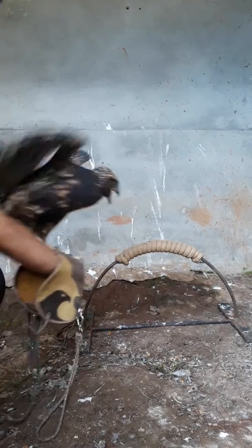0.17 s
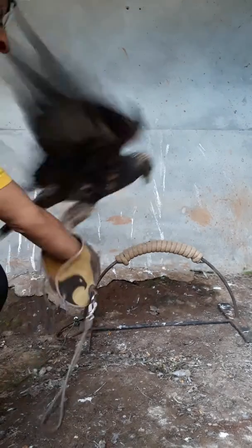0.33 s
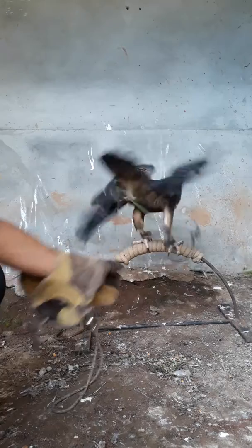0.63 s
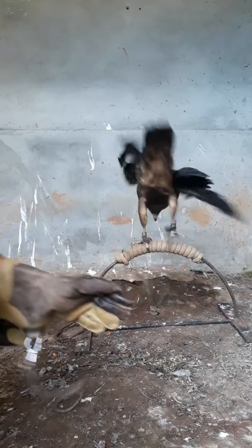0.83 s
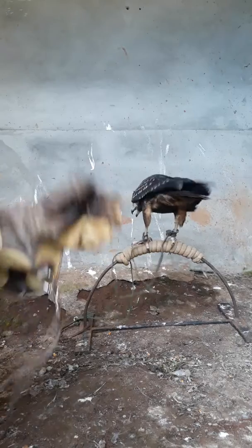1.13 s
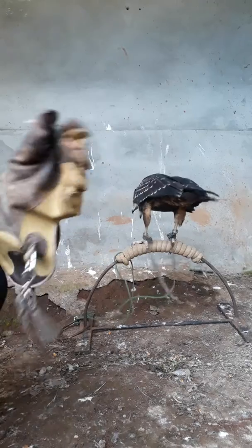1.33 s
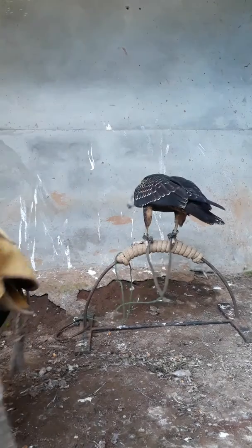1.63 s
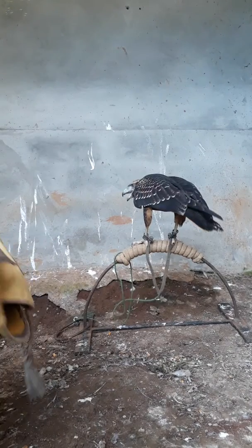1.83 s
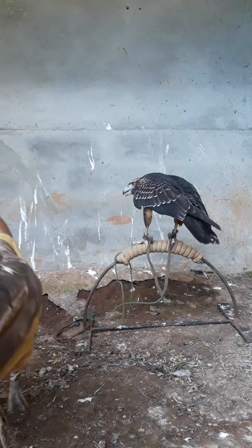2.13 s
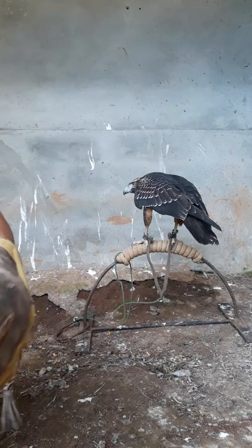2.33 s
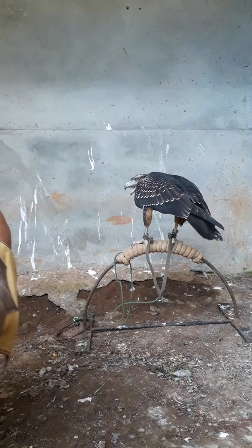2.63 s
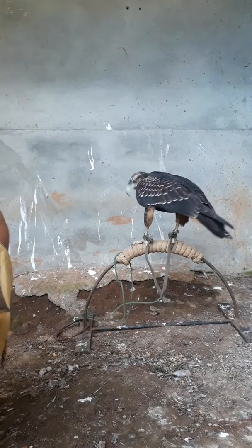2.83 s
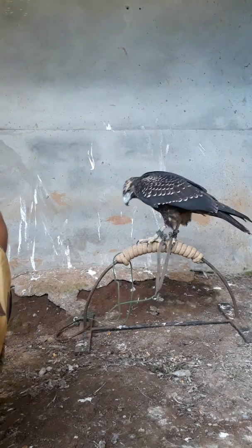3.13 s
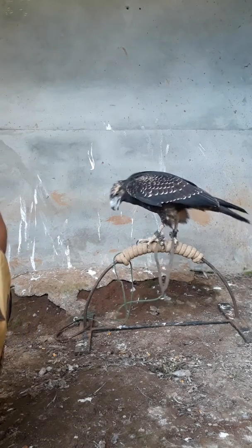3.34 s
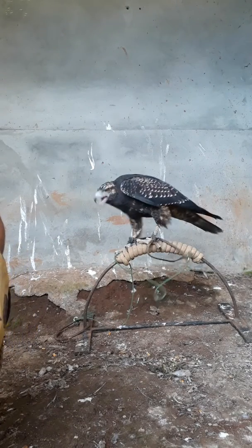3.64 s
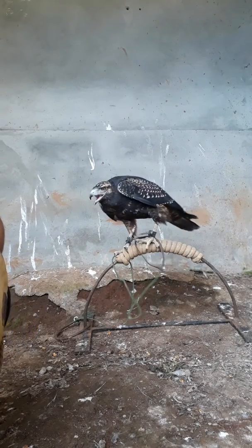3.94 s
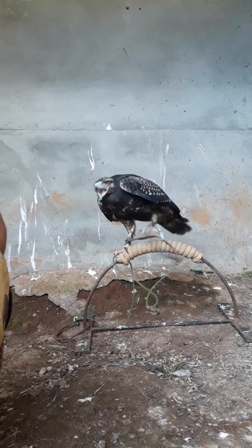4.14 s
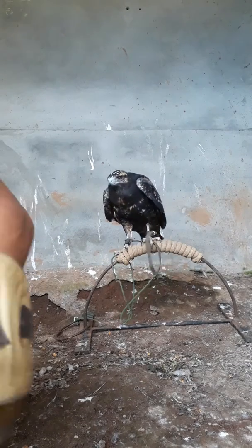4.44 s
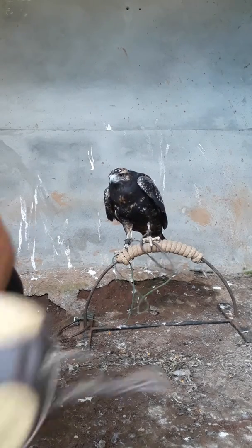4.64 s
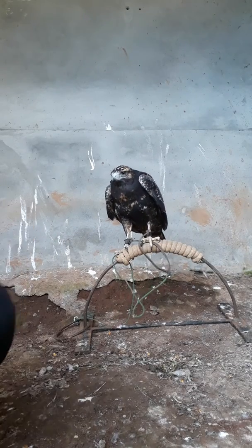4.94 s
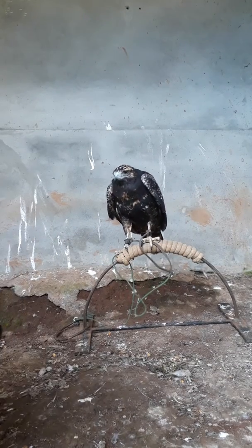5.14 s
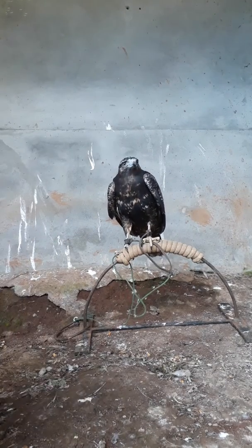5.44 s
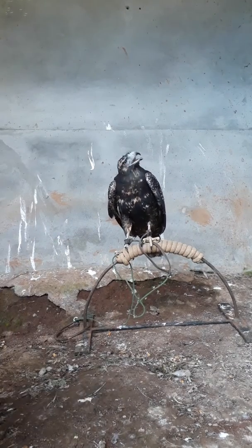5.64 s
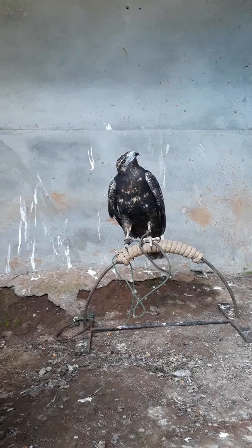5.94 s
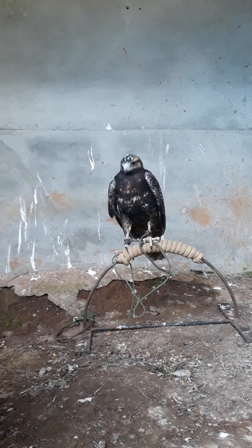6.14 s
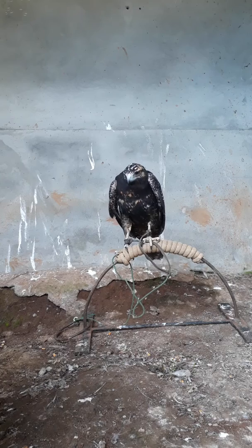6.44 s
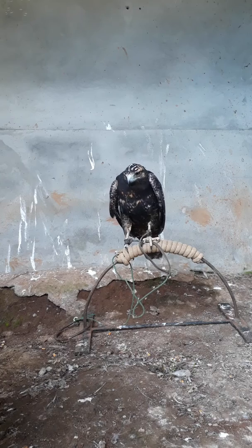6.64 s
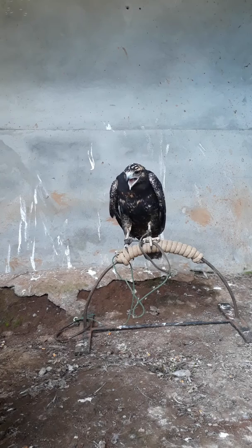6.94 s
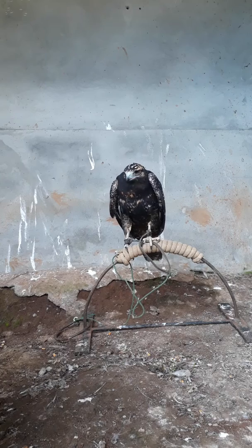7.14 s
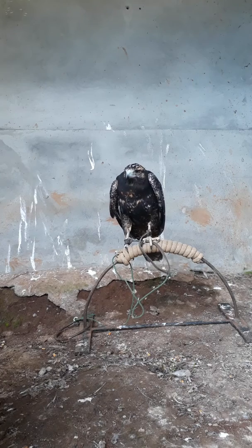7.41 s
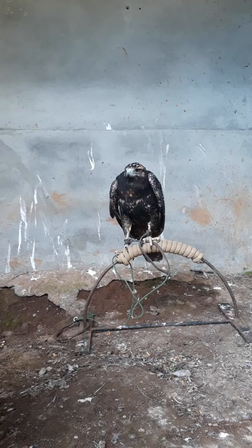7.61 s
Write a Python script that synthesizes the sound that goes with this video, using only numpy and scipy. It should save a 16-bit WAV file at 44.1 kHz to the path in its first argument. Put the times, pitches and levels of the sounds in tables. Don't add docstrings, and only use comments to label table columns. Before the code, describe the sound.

A young bird of prey begs loudly in a bare concrete pen. Seven calls come quickly, each a breathy high whistle that plunges into a short hoarse cry, often followed by a rising squeak. Feathers rustle and a steel swivel ticks. After the seventh call come knocks and scrapes, then two more spaced cries. Hard walls ring; distant traffic hums. Close, thin phone microphone.

```python
import sys
import numpy as np
from scipy import signal
from scipy.fft import rfft, irfft
from scipy.io import wavfile
from scipy.ndimage import uniform_filter1d, map_coordinates

SR = 44100
rng = np.random.default_rng(int(sys.argv[2]) if len(sys.argv) > 2 else 0)


def gain_from_db(level_db):
    decades = np.asarray(level_db, float) / 20
    return 10 ** decades


def transcribe(u):
    v = np.clip(np.atleast_2d(u).T, -1, 1)
    q = np.round(v * 32767).astype(np.int16)
    wavfile.write(sys.argv[1], SR, q)


N = 342657
TIME = np.arange(N) / SR
STEPS = np.linspace(0, 1, 17)

# start t/s, length t/s, pitch f/Hz, fundamental level/dB, entry above the pitch [share]
CRIES = [(0.217, 0.12779, 1789, -24, 0.13), (0.727, 0.087247, 1770, -20.5, 0.092),
         (1.329, 0.12099, 1945, -21, -0.043), (2.03, 0.14383, 1947, -20.5, -.045),
         (2.818, 0.1226, 1895, -22, -0.066), (3.609, 0.11407, 1863, -27, 0.05),
         (4.232, .142, 1829, -25, 0.056), (5.712, 0.09767, 1659, -18.5, 0.067),
         (7.002, 0.15479, 1928, -23, -0.015)]


def unit(x):
    return x / np.sqrt(np.mean(x ** 2) + 1e-20)


def along(points, hz):
    f, v = np.transpose(points)
    return np.interp(np.log(hz + 1), np.log(f + 1), v)


def over_time(points):
    return np.interp(TIME, *np.transpose(points))


def coloured(x, points):
    return irfft(rfft(x) * gain_from_db(along(points, np.fft.rfftfreq(N, 1 / SR))), N)


def wobble(rate):
    return map_coordinates(rng.standard_normal(int(N * rate / SR) + 4), [TIME * rate])


def noise(spectrum, patchy_db=0):
    z = signal.stft(rng.standard_normal(N), SR, nperseg=512)[2]
    field = uniform_filter1d(rng.standard_normal(z.shape), size=9, axis=0)
    field = uniform_filter1d(field, size=8, axis=1)
    white = signal.istft(z * gain_from_db(patchy_db * unit(field)), SR, nperseg=512)[1][:N]
    return unit(coloured(white, spectrum))


def played(rows, fade=0.0062):
    s, *cols = np.transpose(rows)
    span = slice(round(s[0] * SR), round(s[-1] * SR))
    t = TIME[span]
    gate = np.clip(np.minimum(t - s[0], s[-1] - t) / fade, 0, 1)
    return span, gate, [np.interp(t, s, c) for c in cols]


def burst(start, length, crest, fade_db, *levels_db):
    away = np.where(STEPS < crest, 1 - STEPS / crest, (STEPS - crest) / (1 - crest))
    return np.transpose([start + length * STEPS] + [db + fade_db * away ** 1.3 for db in levels_db])


def narrow(rows, hz, width):
    out = np.zeros(N)
    span, gate, (db,) = played(rows)
    band = [(hz * (1 - 3 * width), -36), (hz * (1 - width), 0),
            (hz * (1 + width), 0), (hz * (1 + 3 * width), -36)]
    out[span] = gate * gain_from_db(db) * noise(band)[span]
    return out


def whistle():
    # f/Hz, level/dB per Hz
    breath = [(1800, -53.5), (2900, -18), (3800, 1), (5500, 4.5), (7000, 2.5), (9300, -8), (10500, -8.5),
              (15500, -21)]
    out = np.zeros(N)
    hiss = unit(noise(breath, patchy_db=2.5) * gain_from_db(2.5 * wobble(220)))
    flutter, smear = wobble(300), wobble(900)
    stray, patches_db = .014 * wobble(70), 3.3 * wobble(110)
    drift = .016 * wobble(22)
    for rows, (octave_db, third_db, rough, veil_db, fuzz) in squeaks() + held_whistles() + strands():
        span, gate, (hz, tone_db, breath_db) = played(rows, fade=.011)
        swell_db = tone_db - tone_db[0]
        weak = np.clip(1 - swell_db / 16, .06, 1)
        shake = fuzz * weak * smear[::-1][span] + rough * (.013 * flutter[span] + stray[span])
        turn = 2 * np.pi * np.cumsum(hz * (1 + drift[span] + shake)) / SR
        veiled_db = octave_db + np.interp(2 * hz, (8800, 10000), [0, veil_db])
        tone = np.sin(turn) + gain_from_db(veiled_db) * np.sin(2 * turn)
        tone = tone + gain_from_db(third_db - .8 * swell_db) * np.sin(3 * turn)
        tone = (1 + .5 * rough * smear[span]) * tone
        tone = gain_from_db(tone_db - 1.5 + rough * patches_db[span]) * tone
        out[span] += gate * (tone + gain_from_db(breath_db) * hiss[span])
    return out + voice_breaks()


def held_whistles():
    holds = [
        (.055, 4200, 5325, -35.5, -36),
        (.56, 4030, 5354, -32.5, -39),
        (1.205, 6556, 5500, -34, -40),
        (1.873, 6900, 5831, -43.5, -39.5),
        (2.695, 6220, 5500, -36.5, -40),
        (3.498, 5520, 5850, -35.5, -43.5),
        (4.108, 5270, 5500, -37.5, -36),
        (5.478, 3850, 5359, -45, -63),
        (6.874, 5850, 5548, -48.5, -54),
    ]
    falls = [(0.167, 0.198, 4224, -8.5, 1.5), (0.686, 0.711, 4103, -9.5, 1.6),
             (1.278, 1.316, 3792, -10.5, 1.8), (1.943, 2.021, 3490, -14.5, 1.3),
             (2.754, 2.807, 3520, -15, 1), (3.528, 3.592, 3507, -16.5, .8), (4.171, 4.208, 3994, -11, 1.7),
             (5.655, 5.691, 3445, -23.5, 1.2), (6.929, 6.969, 3570, -24, .95)]
    settles = [.34, .45, 1, 1, .9, .34, .34, .36, .3]
    meets = [2.0, 1.8, 1.6, 1.8, 1.95, 1.3, 1.7, 1.5, 1.6]
    sags = [-250, 53, 10, 10, 8, 10, 10, 480, 150]
    # octave level/dB, third level/dB
    octaves = [(-21.5, -40.5), (-17, -30), (-19, -34), (-28.5, -37.5), (-23, -39), (-19, -30), (-21.5, -35),
               (-10, -10), (-19, -30.5)]
    roughness = [1.2, 1.1, 1, 1, 1, .9, .8, .6, .75]
    veils = [-3.5, 3, -8.5, -12.5, -17, -4, -14, 5, 10.5]
    fuzzes = [.09, .03, .07, .1, .1, .03, .11, .01, .02]
    curves = [whistle_path(held, fall, settle, meet * call[2], sag_hz)
              for held, fall, settle, meet, call, sag_hz in zip(holds, falls, settles, meets, CRIES, sags)]
    voices = [(*pair, rough, veil_db, fuzz)
              for pair, rough, veil_db, fuzz in zip(octaves, roughness, veils, fuzzes)]
    return list(zip(curves, voices))


def whistle_path(held, fall, settle, aim_hz, sag_hz):
    start, entry_hz, hold_hz, hold_db, air_db = held
    knee, crest, crest_hz, crest_db, late = fall
    clear_db = -0.5
    found = np.sin(np.pi / 2 * np.minimum(STEPS / settle, 1))
    hold = [start + (knee - start) * STEPS, entry_hz + (hold_hz - entry_hz) * found - sag_hz * STEPS,
            hold_db - 5 * (1 - found), air_db - 3 * (1 - found)]
    u = STEPS[1:]
    knee_hz = hold_hz - sag_hz
    plunge = [knee + (crest - knee) * u, knee_hz + (crest_hz - knee_hz) * u ** late,
              hold_db + (crest_db - hold_db) * u ** (.55 * late ** 2),
              air_db + clear_db * np.sin(np.pi * u / 1.5)]
    t = u * .036
    slide = [crest + t, aim_hz + (crest_hz - aim_hz) * np.exp(-t / .01),
             crest_db - 13 * (1 - np.exp(-t / 0.011)) - 150 * t, air_db + clear_db - 4 * u]
    return np.hstack([hold, plunge, slide]).T


def voice_breaks():
    # t/s, level/dB
    breaks = [(.201, -31), (.727, -31), (1.321, -26.5), (2.015, -27), (2.803, -27), (3.585, -29.5),
              (4.217, -28), (5.691, -36), (6.973, -30.5)]
    out, t = np.zeros(N), np.arange(round(.005 * SR)) / SR
    drop = np.hanning(len(t)) * np.sin(2 * np.pi * np.cumsum(3700 - 1700 * t / t[-1]) / SR)
    for s, db in breaks:
        out[round(s * SR) - len(t) // 2:][:len(t)] += gain_from_db(db) * drop
    return out


def strands():
    glides = [(0.201, 0.03182, 3290, 3030, -21), (0.48, 0.0272, 4100, 3573, -36.5),
              (0.582, 0.013, 5900, 5804, -33), (1.238, .022, 5700, 5233, -30.5),
              (1.316, 0.03139, 4490, 4139, -20.5), (2.005, 0.02648, 4460, 4233, -18.5),
              (3.51, 0.029, 5900, 4974, -36.5), (5.606, .04, 7340, 6870, -55),
              (5.478, 0.02605, 3886, 4144, -43), (6.975, 0.04123, 3400, 3065, -35.5)]
    return [([(s, hz, db, -90), (s + length, last_hz, db, -90)], (-40, -60, .6, 0, .02))
            for s, length, hz, last_hz, db in glides]


def squeaks():
    intakes = [
        (0.449, 0.06489, 2570, -20.5, -38),
        (1.038, 0.061, 2825, -23.5, -44),
        (1.747, 0.058, 2846, -22, -45.5),
        (2.542, 0.05314, 2799, -24, -46),
        (3.33, 0.04, 2896, -35, -60),
        (3.943, 0.05017, 2835, -21, -45.5),
    ]
    climbs = [2.7, 2.6, 2.8, 2.5, 2, 2.7]
    voice = (-13, -30, .7, -20, .015)
    return [(squeak_path(*row, climb), voice) for row, climb in zip(intakes, climbs)]


def squeak_path(start, length, hz, db, breath_db, climb):
    shape = [(0, -18.5, -18), (.2, -7, -9), (.42, -1, -3), (.75, -9, 1), (1, -20, 0.5)]
    share, tone, air = np.transpose(shape)
    return np.transpose([start + length * STEPS, hz * climb ** STEPS ** 1.05,
                         db + np.interp(STEPS, share, tone), breath_db + np.interp(STEPS, share, air)])


def cry():
    # second level/dB, third level/dB; beak starts closing [share], half-way lines level/dB,
    # their loss [dB/s]
    beaks = [(6.5, -2, 0.6248, 2.5, 596), (6, -4, 0.34, -3.5, 334.5), (4.5, -4, 0.76, -6.5, 251.5),
             (4, -4.5, 0.7667, 1, 302.5), (8.5, -4, 0.69, 7.5, 386.5), (8, -2.5, 0.31, 11, 254),
             (9.5, -3, 0.455, 6.5, 184.5), (-2.5, -12, 0.6449, -8.5, 351.5), (1.5, -6, 0.72, 14.5, 331.5)]
    efforts = [(0.54, 1, .7, 0.056, 0), (0.37, -4, 0.99, 0.014, -16), (0.34, 16, .5, 0.1, -4.5),
               (0.44714, 14.5, .62, .1, -8), (0.25, 3, .6, 0.062, -7), (.3, -3.5, .3, 0.1033, -4),
               (.4, 4.5, 0.55, 0.0805, -10), (0.36, 1.5, 0.45637, 0.07569, -6),
               (0.6536, 7, 0.53, 0.10254, -14.5)]
    locks = [(0.016, .2), (0.026, .16), (0.031, 0.15), (0.025, 0.1521), (0.013, 0.14), (.01, .16),
             (.012, 0.32), (0.01699, .16), (0.0065, 0.1822)]
    # fourth level/dB, those above level/dB
    beams = [(-2, 4.5), (0, 7), (-7, -4), (-10, -9), (1, -2), (3, -1), (2, 4), (0.5, 6), (6, -0.5)]
    upper = [-11.5, -23, -35, -37, -35]
    halves = [-19, -7, -8, -19, -19, -28, -30, -34.5]
    # f/Hz, level/dB per Hz
    rasp_colour = [(600, -29), (1200, -1.5), (2200, -7), (3500, 3.5), (6000, -11), (9300, -12.5),
                   (10500, -26.5), (15500, -35.5)]
    out, rasp, jitter = np.zeros(N), noise(rasp_colour, patchy_db=2), wobble(250)
    flicker_db = 4 * wobble(120)
    for rows, (fourth_db, above_db) in zip(map(cry_path, CRIES, beaks, efforts, locks), beams):
        span, gate, (hz, first_db, second_db, third_db, half_db) = played(rows, fade=.011)
        hoarse = np.exp(-np.arange(len(hz)) / (0.013277 * SR))
        turn = 2 * np.pi * np.cumsum(hz * (1 + (.001 + .014 * hoarse) * jitter[span])) / SR

        def partial(k, db):
            return gain_from_db(db) * np.sin(k * turn + k * k) * (k * hz < 15700)

        def own(k):
            return flicker_db[(np.arange(span.start, span.stop) + 3001 * k) % N]

        stack = partial(1, (.3 + hoarse) * own(25) - 6 * hoarse)
        stack += partial(2, second_db) + partial(3, third_db + .3 * own(20))
        for k, db in enumerate(upper):
            beam_db = above_db if k else fourth_db
            stack += partial(k + 4, third_db + db + beam_db + .7 * own(k + 10))
        for k, db in enumerate(halves):
            stack += partial(k + .5, half_db + db + 1.4 * own(k) + above_db * (k > 3))
        rasp_gain = gain_from_db(half_db - 21.0) + gain_from_db(-41.0) + gain_from_db(-2.0) * hoarse
        out[span] += gate * gain_from_db(first_db + 1.5) * (stack + rasp_gain * rasp[span])
    return out


def cry_path(call, beak, effort, lock):
    start, length, hz, db, entry = call
    second_db, third_db, closes, half_db, loss = beak
    widest, lift_db, droops, droop, attack_db = effort
    joins, lasts = lock

    def after(share):
        return np.clip((STEPS - share) / (1 - share), 0, 1)

    t = length * STEPS
    loose_db = -13 / (1 + np.exp((t - joins) / 0.0043))
    shut, fresh = after(closes), np.exp(-t / 0.009667)
    gape_db = lift_db * np.exp(-((STEPS - widest) / lasts) ** 2)
    sink = droop * np.minimum(1.35 * after(droops), 1) ** 1.5
    out_of_breath_db = -14 * after(0.5827) ** 2.0735
    return np.transpose([start + t, hz * (1 + entry * np.exp(-t / .022) - sink),
                         db + attack_db * fresh + out_of_breath_db - 0.31 * gape_db,
                         second_db + loose_db + gape_db - 20.5 * shut,
                         third_db + loose_db + 0.55 * gape_db - 7 * fresh - 16 * shut,
                         half_db - 13 * fresh - loss * t])


def rustle():
    sweeps = [(0.06, 0.25, 0.39, -63, 7.5), (0.338, 0.11, 0.39, -52, -4), (0.547, 0.3833, 0.4, -52.5, -6),
              (1.997, 0.1, 0.48, -62.5, 2.5), (2.3, 0.17, 0.31, -72.5, -6.5), (3.003, .12, .2, -78.5, 0),
              (4.206, 0.15, .3, -59.5, 2), (3.955, 0.046, .3, -74, 4), (4.106, .13, .5, -67.5, 1.5),
              (4.399, 0.31, 0.24, -55.5, -6), (5.718, 0.091, .25, -68, 5.5), (3.492, 0.22, 0.3, -66, 4),
              (6.892, 0.11, .4, -60, -2)]
    # f/Hz, level/dB per Hz
    feather_colour = [(300, -27), (1000, 8), (2000, -3.5), (4500, -1.5), (7500, -8.5), (9500, -6),
                      (12000, -15), (15700, -13.5)]
    # f/Hz, level/dB per Hz
    barb_colour = [(8500, -29.5), (11000, -1), (14500, 0), (15800, -4.5)]
    out = np.zeros(N)
    feathers = unit(noise(feather_colour, patchy_db=-2.0) * gain_from_db(1.6 * wobble(140)))
    barbs = unit(noise(barb_colour, patchy_db=4.5) * gain_from_db(2.5 * wobble(90)))
    for start, length, crest, top_db, barbs_db in sweeps:
        span, gate, (db,) = played(burst(start, length, crest, -15.5, top_db), fade=0.0078)
        out[span] += gate * gain_from_db(db + 9.0) * (feathers[span] + gain_from_db(barbs_db) * barbs[span])
    return out


def scuffs():
    drags = [
        (.0, 0.6172, 0.997, -52.5, -58),
        (0.471, 0.3838, 0.7054, -44.5, -43.5),
        (2.545, .6, 0.68, -61, -46.5),
        (5.155, 0.38518, 0.4322, -39, -37.5),
        (7.31, 0.6672, 0.4417, -49, -54),
    ]
    out = np.zeros(N)
    low = noise([(30, -24), (130, 0), (300, 0), (500, -30)], patchy_db=3)
    low = unit(low * gain_from_db(2.2 * wobble(40)))
    high = noise([(250, -40), (550, 0), (800, -2), (1500, -12), (1900, -26), (4000, -26),
                  (9000, -36), (11000, -50)], patchy_db=1.5)
    high = unit(high * gain_from_db(2.2 * wobble(50)))
    for start, length, crest, *tops_db in drags:
        span, gate, (low_db, high_db) = played(burst(start, length, crest, -8.5, *tops_db), fade=0.021)
        out[span] += gate * (gain_from_db(low_db - 8.5) * low[span] + gain_from_db(high_db - 3.5) * high[span])
    return out


def knocks():
    # t/s, level/dB, pitch f/Hz, grit re it level/dB, thud re ring level/dB
    blows = [(.346, -32.5, 686.8, -12.5, 1.5), (2.975, -31, 731.9, -30, -10.5),
             (4.649, -19, 244.6, -44, -1.5), (4.663, -24, 151, -34.5, -12), (5.218, -26, 600, -20, -4),
             (5.231, -16, 654.7, -30, -13), (5.263, -24, 597.1, -26.5, -14.5), (5.305, -25, 300, -20, -4),
             (5.328, -21, 420.1, -12.5, -7.5), (5.412, -27, 700, -20, -4), (5.435, -27, 750, -20, -4),
             (5.565, -32.5, 257.2, -21.5, -9), (5.684, -13.5, 253.4, -27, -16.5),
             (6.227, -28, 310.8, 3, 0.5), (6.339, -33, 1010, -15, 2), (6.534, -15.5, 681.9, -15, -24.5),
             (6.618, -32.5, 289, -4, -7), (6.733, -21.5, 614, -3, -14), (6.952, -25.5, 1116, 6, -2.5),
             (6.968, -36.5, 119.3, -27.5, -10.5), (7.031, -35.5, 282, -29, -8.5),
             (7.045, -27, 636.5, -27, -4.5), (7.321, -33, 150, -30.5, -9.5),
             (7.41, -27, 124.7, -30.5, -24.5), (7.455, -30.5, 134.9, -40, -27),
             (7.514, -29, 114.9, -31.5, -20.5)]
    out, t = np.zeros(N + SR), np.arange(SR // 4) / SR
    thud = noise([(80, -12), (200, 0.5), (1300, 1.5), (2000, -21.5), (5000, -34.5)])
    grit = noise([(1500, 18.5), (2500, -13.0), (5000, 3.5), (9000, -28), (11000, -7.5), (15700, -18.5)])
    waver = wobble(160)
    for s, db, hz, grit_db, thud_db in blows:
        t60 = max(.065 + .0007 * grit_db, .01)
        i = round((s + .002) * SR)
        ring = np.sin(2 * np.pi * hz * np.cumsum(1 + .05 * waver[i:][:len(t)]) / SR)
        body = ring + gain_from_db(thud_db) * thud[i:][:len(t)] + gain_from_db(grit_db - 11.0) * grit[i:][:len(t)]
        out[i:][:len(t)] += gain_from_db(db - 6.0 - 60 * t / t60) * (1 - np.exp(-t / 0.00053)) * body
        out[i:][:len(t)] += gain_from_db(db + grit_db - 18.5 - 60 * t / 0.31) * grit[i - 999:][:len(t)]
    return coloured(out[:N], [(50, -25), (130, 0.5)])


def ticks():
    # t/s, level/dB, lower ring re it level/dB
    clicks = [(.3626, -36, -4.5), (.386, -40, -9), (.397, -42, -9.5), (.835, -46, -20), (0.8564, -46, -23),
              (.88, -49.5, -19.5), (0.9348, -39, 1), (0.9563, -33, -4), (.963, -35.5, 2), (.99, -49.5, -15),
              (1.0179, -39, -5), (1.052, -44, -16.5), (1.1135, -47.5, -19.5), (1.129, -48.5, -21),
              (1.508, -45.5, -16), (1.6522, -51, 7.5), (1.6758, -52.5, 10.5), (2.186, -37, -8.5),
              (2.237, -66.5, 25.5), (2.532, -62.5, 13), (3.3286, -39.5, -9), (4.6193, -41.5, -18.5),
              (4.7459, -46, -17.5), (4.8559, -41.5, -8), (4.8898, -52, -13.5), (5.0392, -55, -12.5),
              (5.1215, -46, 1), (5.162, -48.5, 1.5), (5.1848, -48.5, 3), (6.0639, -42.5, -4),
              (6.735, -51.5, 8), (6.757, -51, 8.5), (7.002, -41, 13.5), (7.182, -45.5, -21)]
    out, t = np.zeros(N + SR), np.arange(SR // 40) / SR
    bright = noise([(8000, -25.5), (10000, 5.5), (15700, -2.5)])
    lower = noise([(2000, -37.5), (3200, 0.0), (8500, 4.5), (10000, -10.0)])
    for s, db, lower_db in clicks:
        i = round(s * SR)
        ring = bright[i:][:len(t)] + gain_from_db(lower_db) * lower[i:][:len(t)]
        out[i:][:len(t)] += gain_from_db(db - 7.0 - 60 * t / 0.014) * ring
    return out[:N]


def small_noises():
    # t/s, level/dB
    linger = [(0, -48), (.06, -64)]
    # t/s, level/dB
    puff = [(1.535, -46), (1.56, -36.5), (1.62, -47), (1.75, -52)]
    # t/s, level/dB
    ruffle = [(4.4, -55), (4.45, -47.5), (4.5, -50), (4.55, -49), (4.61, -51.5), (4.67, -61.5)]
    # t/s, level/dB
    singing = [(4.55, -60.5), (4.6, -73)]
    # t/s, level/dB
    sole_grit = [(5.215, -64), (5.235, -53), (5.27, -72.5), (5.3, -67.5), (5.33, -51), (5.37, -68),
                 (5.43, -71)]
    # t/s, level/dB
    skid = [(6.728, -59), (6.75, -54), (6.79, -68)]
    out = narrow(linger, hz=4627, width=0.1534) + narrow(puff, hz=1316.1, width=0.15)
    out += narrow(ruffle, hz=5500, width=0.3054) + narrow(singing, hz=8650, width=0.0066)
    return out + narrow(sole_grit, hz=3505.3, width=0.1081) + narrow(skid, hz=4453, width=0.1364)


def slap(x):
    return gain_from_db(-5.0) * np.roll(x, round(.0215 * SR))


def pen(x):
    # f/Hz, time to fall by 60 dB t/s
    decay = [(200, 0.25), (1800, 0.30541), (4000, 0.20438), (7000, 0.20284), (12000, 0.093)]
    hz, t, z = signal.stft(rng.standard_normal(SR), SR, nperseg=256)
    t60 = along(decay, hz)[:, None]
    fading = gain_from_db(-60 * t / t60) + gain_from_db(-31 - 60 * t / (3.2954 * t60))
    tail = signal.istft(z * fading, SR, nperseg=256)[1]
    return signal.fftconvolve(np.pad(x, (200, 0)), tail / np.linalg.norm(tail))[:N]


def insects():
    # t/s, level/dB
    early = [(2.9, -79), (3.1, -72), (3.45, -70), (3.55, -79)]
    # t/s, level/dB
    late = [(7.36, -74), (7.45, -65), (7.55, -72)]
    return narrow(early, hz=6279, width=0.017) + narrow(late, hz=6040.4, width=0.032)


def engines():
    # t/s, level/dB
    idling = [(0, -58), (.5, -65.5), (1.5, -63), (2.4, -63), (3.3, -72)]
    # t/s, level/dB
    passing = [(3.3, -72), (3.9, -63), (4.6, -63), (5.8, -66), (6.3, -67.5)]
    return narrow(idling, hz=105.82, width=.07) + narrow(passing, hz=181.36, width=0.097)


def outdoors():
    # t/s, level/dB
    hum = [(0, -55), (.8, -51.5), (1.8, -52), (3, -49.5), (3.4, -53.5), (4.9, -47.5), (5.8, -52),
           (6.8, -50), (7.77, -54.5)]
    # f/Hz, level/dB per Hz
    traffic_colour = [(150, -33), (250, -9.5), (385, -7), (545, -3.5), (771, -5.5), (1130, -7), (1650, -8),
                      (1930, -25), (4360, -25), (5460, -25.5), (10900, -30), (13900, -31), (15700, -33)]
    # f/Hz, level/dB per Hz
    rumble_colour = [(12, -49), (20, -19.5), (27, -17), (40, -20), (62, -11.5), (107, -4.5), (190, -5.5),
                     (300, -7.5), (390, -40), (660, -120)]
    # t/s, level/dB
    lorry = [(6.8, -77.5), (7.25, -57.5), (7.77, -59)]
    # f/Hz, level/dB per Hz
    drone_colour = [(15, -24), (30, 2.5), (50, 2.5), (130, -3), (220, -37)]
    traffic = gain_from_db(over_time(hum) - 1.5 + 0.85 * wobble(7.1)) * noise(traffic_colour, patchy_db=2.5)
    rumble = gain_from_db(-61 + 1.3 * wobble(2.4)) * noise(rumble_colour, patchy_db=1.5)
    drone = gain_from_db(over_time(lorry) + 2.5 * wobble(5.1)) * noise(drone_colour, patchy_db=2.5)
    return traffic + rumble + drone


def scene():
    # t/s, direct sound level/dB
    facing = [(0, -3.5), (.8, -1.5), (1.4, -4), (2.1, -2), (2.9, -4), (3.6, -3.5), (4.2, 0), (5.6, -3.5),
              (7, -1.5)]
    bird, blows = whistle() + cry(), knocks()
    near = blows + ticks()
    echo = slap(blows) + pen(gain_from_db(-4) * bird + gain_from_db(-8) * near)
    direct = gain_from_db(over_time(facing)) * bird + near + rustle() + scuffs() + small_noises()
    return (direct + echo + insects() + engines() + outdoors())[None]


def roll_off(x):
    return signal.sosfilt(signal.butter(12, 15880, fs=SR, output="sos"), x)


def record(dry):
    # f/Hz, level/dB
    mic = [(20, -30), (70, 2.5), (130, 3), (9300, 0), (10300, -10.5), (15800, 1)]
    top_hz, ceiling, offset = 15850, .76, -.0006
    x = coloured(dry, mic + [(top_hz, mic[-1][1]), (top_hz + 60, -60)])
    x = x / (1 + (x / ceiling) ** 6) ** (1 / 6)
    return roll_off(x + offset)


dry = scene()
out = record(dry)
transcribe(out)
```